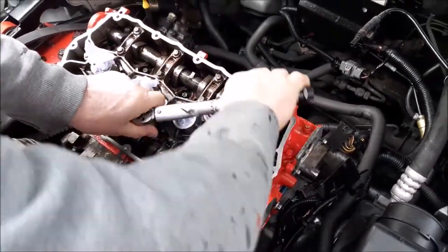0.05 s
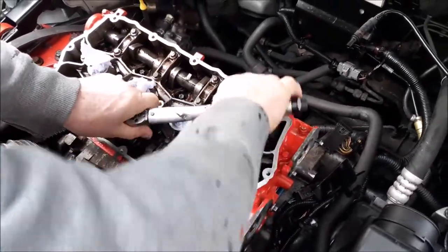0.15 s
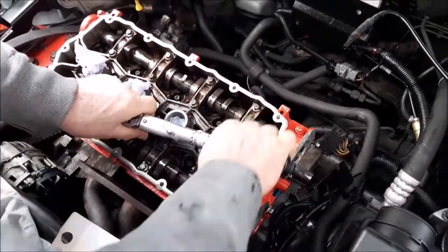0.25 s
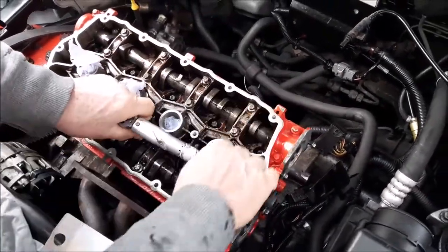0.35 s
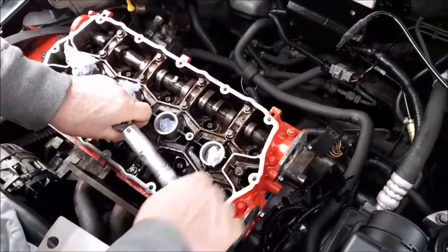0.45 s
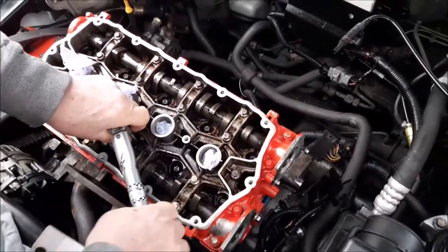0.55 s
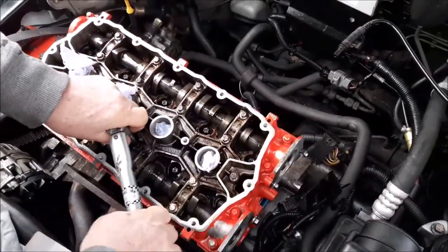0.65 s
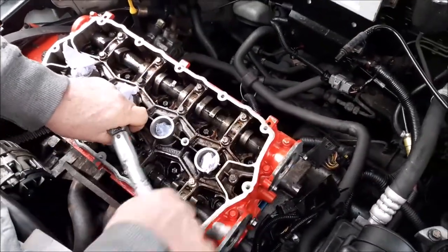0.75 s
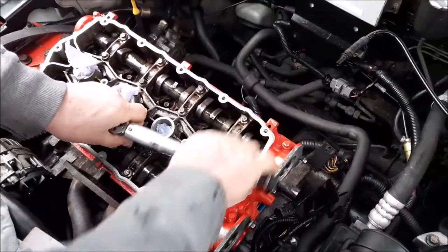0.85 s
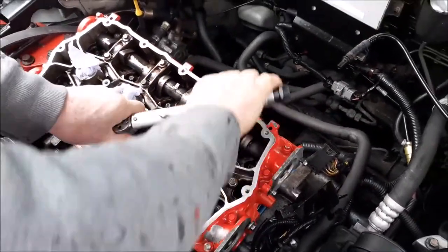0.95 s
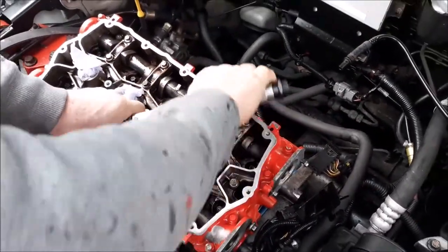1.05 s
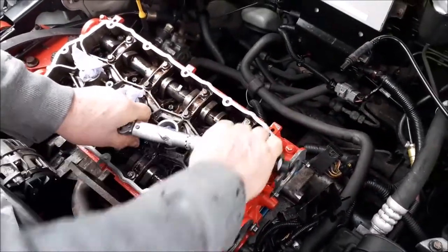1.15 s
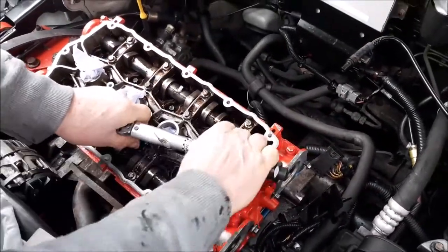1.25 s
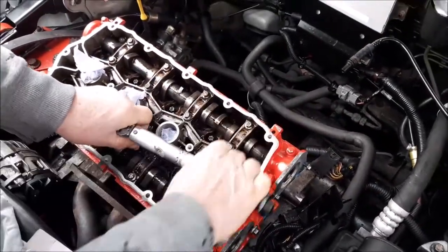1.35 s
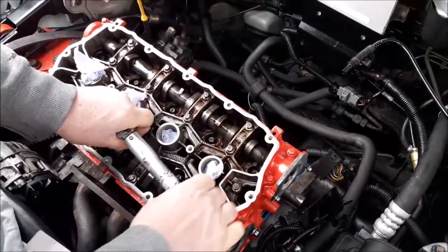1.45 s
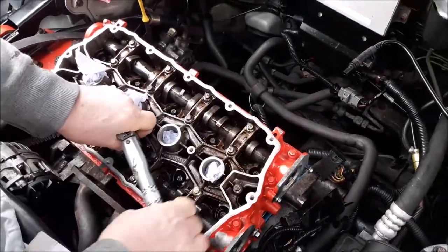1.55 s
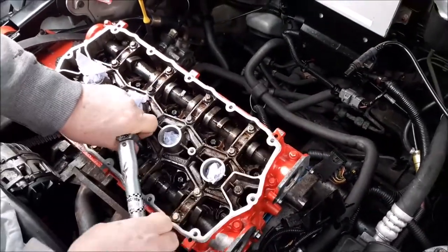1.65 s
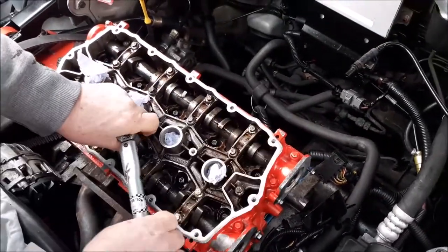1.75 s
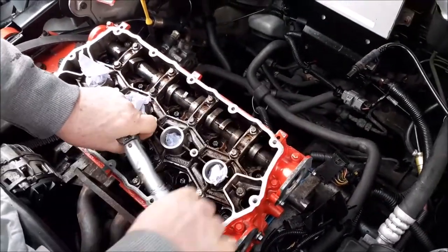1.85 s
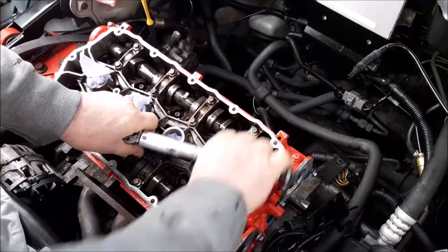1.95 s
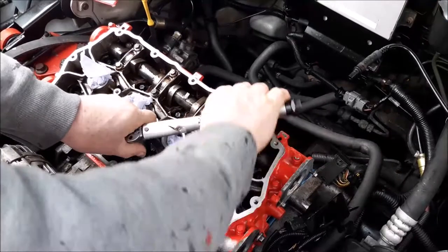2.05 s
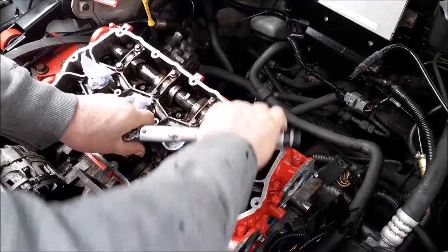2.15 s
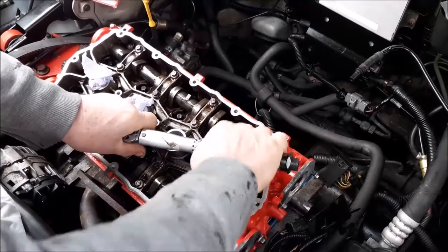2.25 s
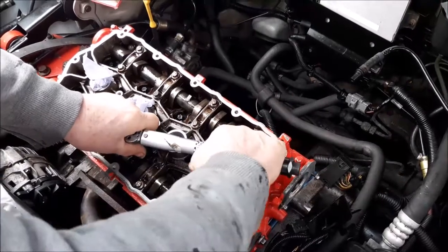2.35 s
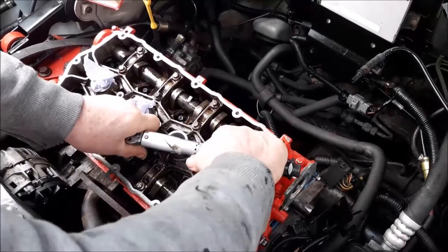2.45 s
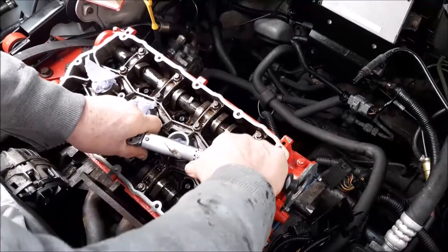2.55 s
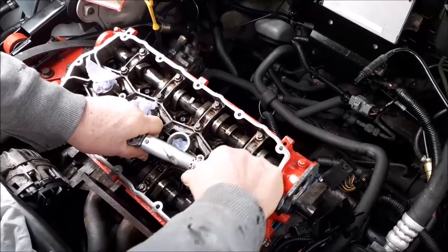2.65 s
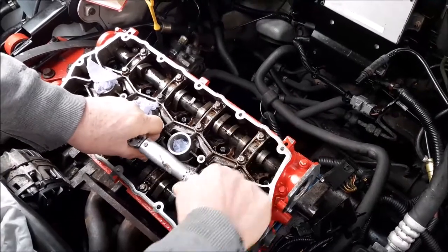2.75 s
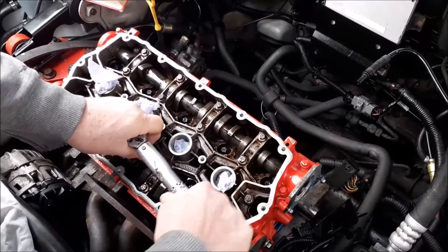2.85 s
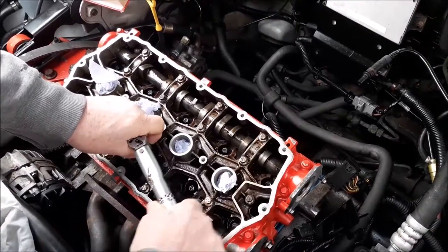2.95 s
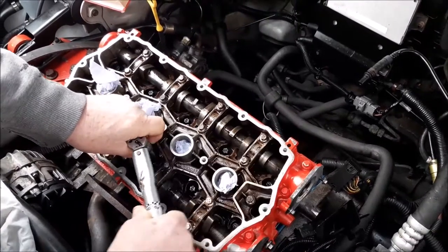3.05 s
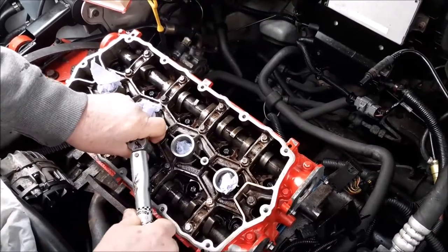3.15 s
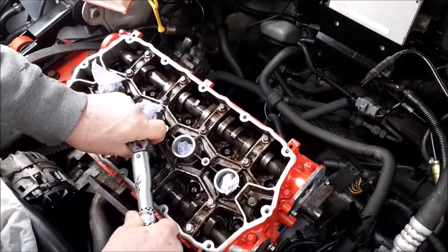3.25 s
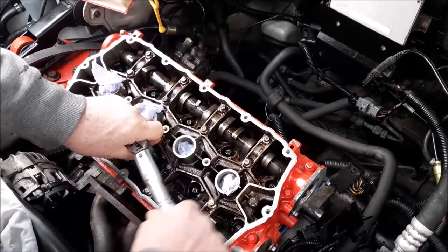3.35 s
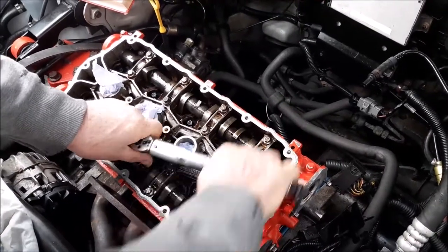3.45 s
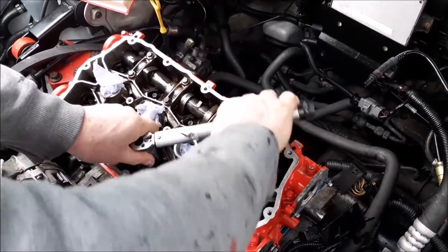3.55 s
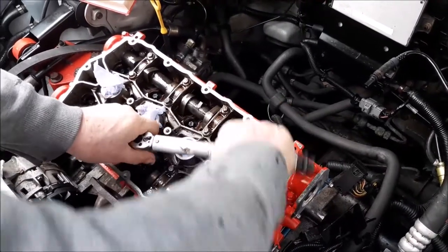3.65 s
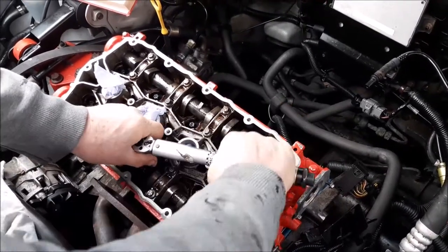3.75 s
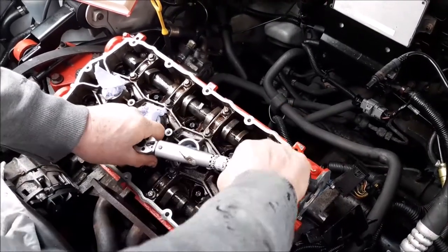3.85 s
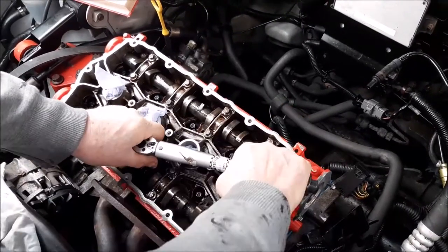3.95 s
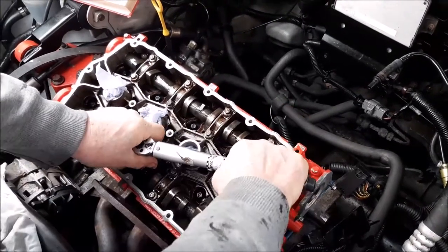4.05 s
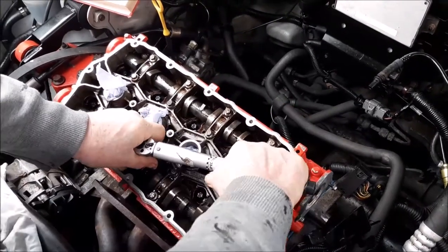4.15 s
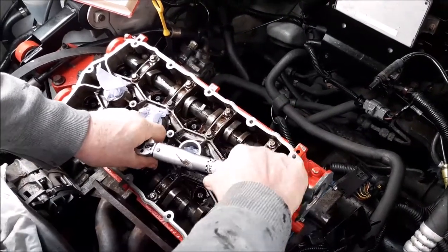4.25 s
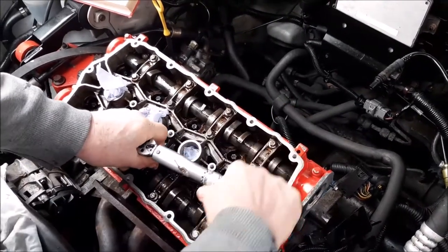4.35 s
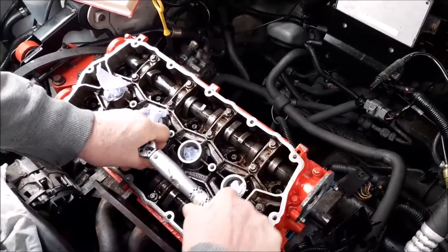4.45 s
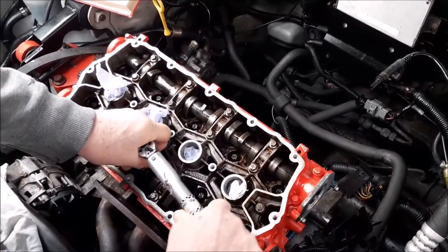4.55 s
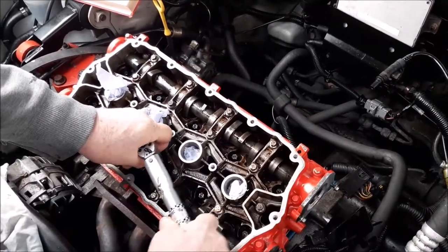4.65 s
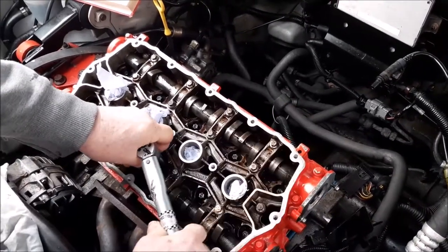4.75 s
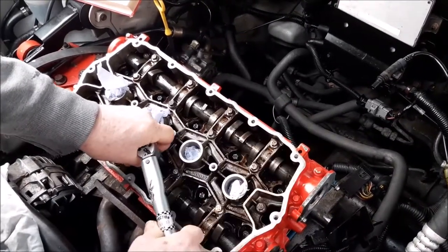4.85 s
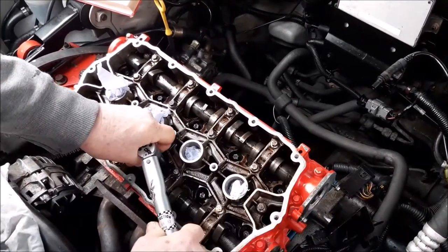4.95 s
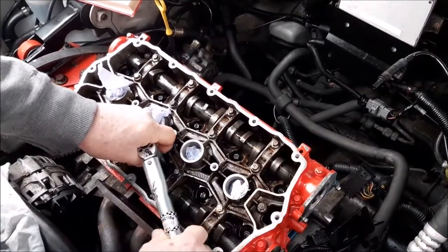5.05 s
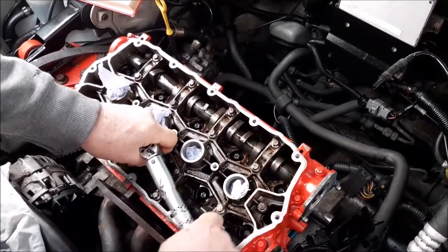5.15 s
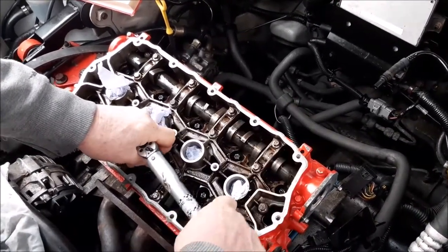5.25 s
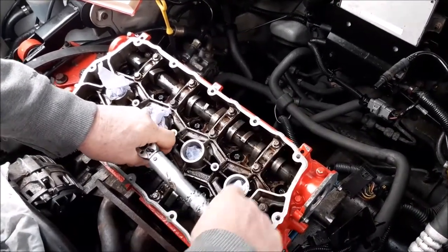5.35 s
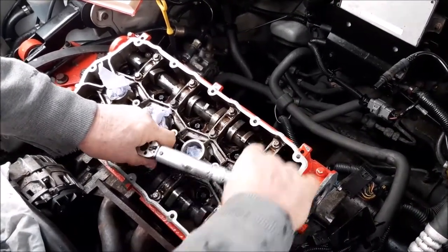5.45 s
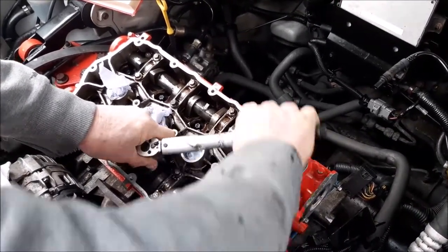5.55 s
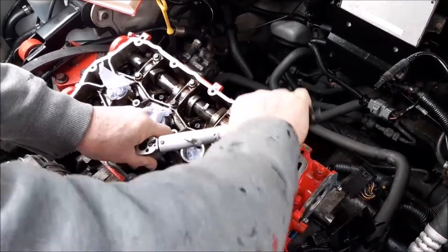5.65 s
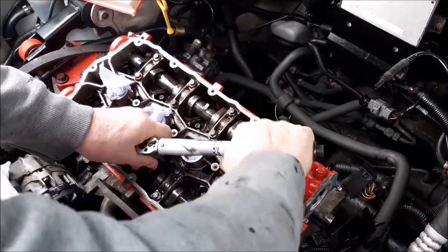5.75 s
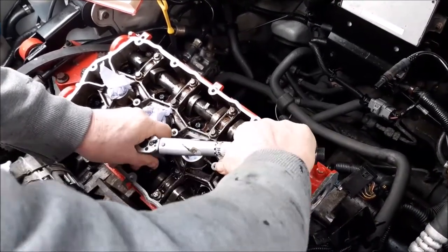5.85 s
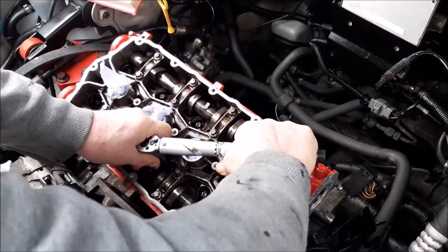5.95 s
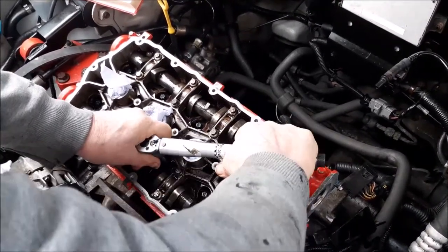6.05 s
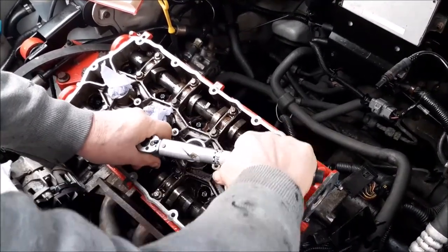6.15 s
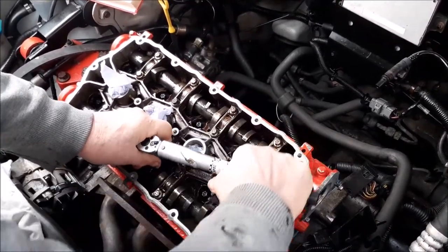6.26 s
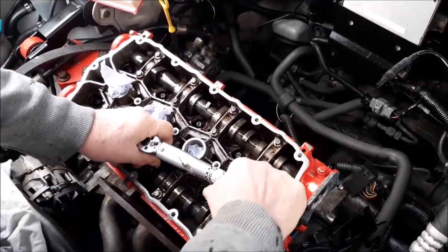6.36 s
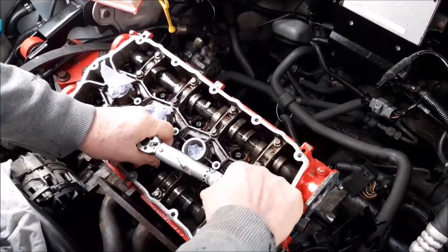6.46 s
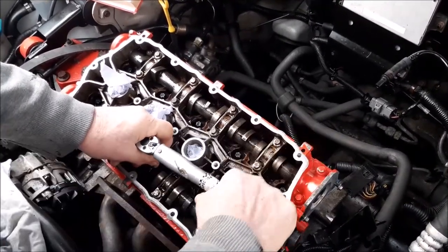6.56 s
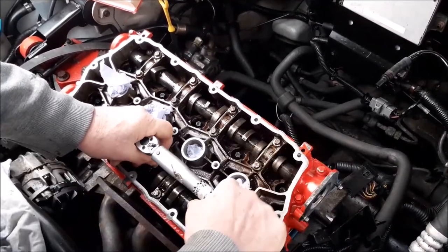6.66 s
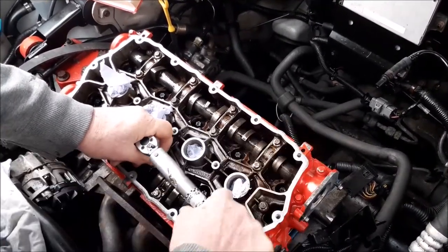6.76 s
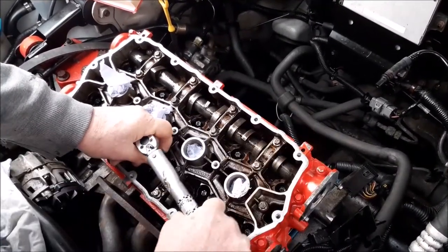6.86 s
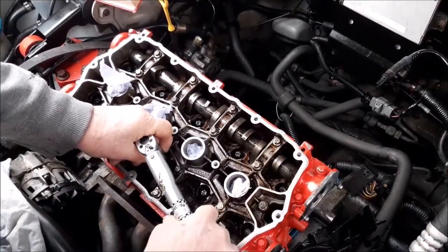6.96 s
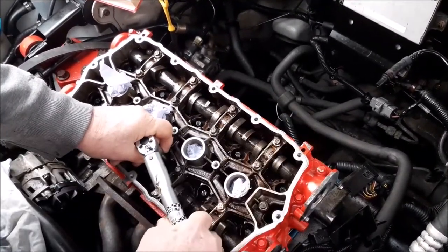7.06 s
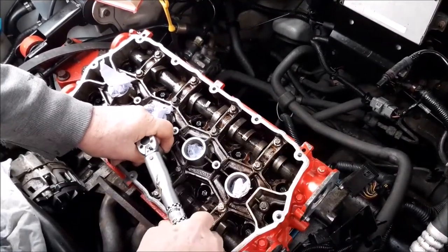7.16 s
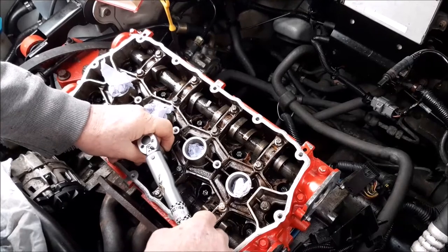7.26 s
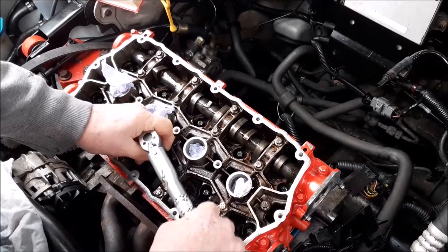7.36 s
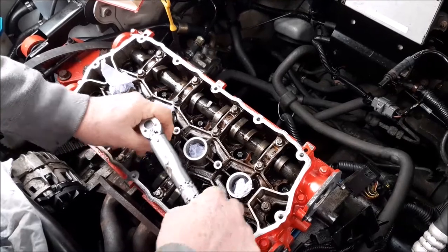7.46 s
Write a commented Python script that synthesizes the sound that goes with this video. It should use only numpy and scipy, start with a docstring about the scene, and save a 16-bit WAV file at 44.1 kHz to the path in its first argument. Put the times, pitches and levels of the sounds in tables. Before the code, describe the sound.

Close up in a quiet garage with little echo, a ratcheting wrench ticks in brief, crisp bursts on each back swing. Light socket rattles and dull metal clonks on the engine alternate with the clicking, the heaviest cluster coming just before the middle. Soft cloth swishes and low hand rumble follow the movement. The ratcheting stops for the last two seconds, leaving room air, a faint far hum and one last sharp clink.

```python
"""A torque wrench ratchets down a cylinder-head bolt, close up in a quiet garage.
On each back swing the pawl slips over a few teeth and snaps home in bright steel clicks. At the ends
of a stroke the socket takes up its play, clinks, and knocks on the engine, which rings and thuds.
Sleeves rustle and hands rumble on the tool; behind them lie steady room air and the faint hum of
a far machine that swells near the end."""
import sys
import numpy as np
from scipy import signal
from scipy.fft import rfft, irfft
from scipy.io import wavfile
from scipy.ndimage import uniform_filter1d

SR = 44100
rng = np.random.default_rng(int(sys.argv[2]) if len(sys.argv) > 2 else 0)


def inscribe(sig):
    """Save sig as 16-bit PCM at rate SR to the path in sys.argv[1].

    A 1-D sig is mono; a 2-D sig holds one channel per row.
    Samples are clipped to [-1, 1] before scaling.
    """
    pcm = np.round(np.clip(np.atleast_2d(sig).T, -1, 1) * 32767)
    wavfile.write(sys.argv[1], SR, pcm.astype(np.int16))


N = 330750
HIT_SIZE = 10240  # samples in one hit
T = np.arange(HIT_SIZE) / SR
EDGE_HZ = 16100

# The pawl dropping off each tooth; the seat is the band of the ring that this tooth lifts:
# start_s, level_db, low_mid_db, top_db, snap_db, seat_hz, seat_db, slip_lead_s
PAWL_CLICKS = [(0.025, -33, 10.5, 9.5, -6.5, 8000, 9, 0.011), (0.0745, -34.5, 11, 8.5, -9, 6500, 8, 0.0047),
               (0.8602, -37.5, 4, 6.5, 2.5, 8400, 6, 0.005),
               (0.8966, -33.5, 2, 5.5, -3.5, 7050, 9.5, 0.0048), (0.9376, -30.5, 4, 11, -5, 8300, 7, 0.005),
               (0.981, -32.5, 9.5, 10, -11, 8300, 9, 0.0061), (1.934, -32.5, 4.5, 4.5, 0.5, 8200, 2, .003),
               (1.9738, -31.5, 0, 5, 0, 4850, -1, 0.0041), (2.0136, -28, 3.5, 4, -7, 15000, 16.5, 0.006),
               (2.0641, -33.5, 2, 7.5, -3, 5700, 7, .0066), (3.4396, -35.5, -5.5, 6, 6, 6100, 8, 0.0078),
               (3.4732, -32.5, 3.5, 9.5, -1, 5160, 11, 0.0039), (3.512, -32, 2, 4, -1, 5120, 9.5, 0.005),
               (3.554, -30.5, 5.5, 4, -10.5, 14500, 9.5, 0.0035),
               (5.4347, -36.5, 0.5, 2.5, 4.5, 8030, 14.5, 0.0093),
               (5.496, -32.5, -1, 4.5, -1, 7660, 8, 0.0047), (5.5499, -33, -2.5, 3.5, -5, 4830, 4, 0.0041),
               (5.62, -34.5, -3, -3.5, -13.5, 8600, 6.5, .0028)]
# Tone colour of the ratchet head: freq_hz, level_db
RATCHET_SPECTRUM = [(150, -35), (1200, -19), (2200, -9), (2900, -9), (3500, -4), (5000, -0.5), (6000, 1),
                    (7200, 2.5), (8100, 0.5), (9200, -4), (11500, -4), (13000, -1), (15200, -6.5),
                    (16000, -24)]
# Clear tones of the steel tool: pitch_hz, level_db, undamped_t60_s
STEEL_MODES = [(5040, -3, .05), (5460, -3, .05), (6470, -3, .06), (7330, -1, .05), (7850, -2, .04),
               (8237, 0, .06), (12600, -6, .04), (14160, -2, .05), (14580, -1, .04), (15040, 1, .04)]
# The loose socket clinking on its drive: start_s, level_db, treble_db, top_db
SOCKET_CLINKS = [(0.259, -51, -14, -4), (0.2683, -42.5, 13.5, -10), (1.172, -52, -3, 2),
                 (1.1803, -45.5, 15, -11), (1.2254, -52.5, 6, 13), (1.6819, -42.5, 14, -2),
                 (1.8384, -58, 7, 23), (1.901, -55, 12, 18), (2.031, -48.5, -12, 18.5),
                 (2.2215, -48, -3, -14), (2.2593, -42.5, 5.5, -35), (3.055, -69, 7, 6),
                 (3.357, -52.5, 6.5, -3.5), (3.401, -56.5, 16, 8), (4.828, -50, -18, -12),
                 (4.889, -68, -4, 0), (5.1425, -56, -0.5, -10), (5.675, -56.5, 2, 5), (5.703, -64, 2, 9),
                 (7.4769, -39.5, -0.5, 22)]
# Tone colour of the socket: freq_hz, level_db
SOCKET_SPECTRUM = [(200, -26.5), (1100, -0.5), (1500, -1.5), (2600, -9), (3500, 5), (4500, -1), (5300, -4),
                   (6300, -8.5), (7100, -9.5), (8200, -0.5), (9200, -8.5), (15500, -19)]
# The tool knocking on the bolt; a harder contact has a higher centre:
# start_s, level_db, centre_hz, thump_db, rasp_db, clonk_hz, clonk_db
BOLT_KNOCKS = [(0.581, -37, 480, -29.5, -10.5, 937, -36), (0.598, -40, 320, -35, -8, 151, -41.5),
               (0.619, -46, 160, -38, 6, 128, -40), (1.176, -53.5, 570, -60, 3, 1010, -53.5),
               (1.673, -37, 830, -33.5, -10.5, 839, -34.5), (1.764, -44.5, 520, -61.5, -7, 743, -50),
               (1.892, -47.5, 440, -31.5, -14.5, 449, -39.5), (2.061, -53.5, 920, -80, 6, 934, -55),
               (2.259, -59, 740, -55, 3, 630, -48.5), (3.045, -54, 754, -60, -10, 935, -60),
               (3.109, -43, 700, -60.5, -10.5, 1365, -43.5), (3.116, -34.5, 537, -49, -4.5, 649, -30),
               (3.148, -43, 200, -44, -7, 258, -35.5), (3.161, -40.5, 398, -37.5, -2, 267.5, -27.5),
               (3.259, -53.5, 277, -62.5, -15, 270, -47.5), (3.333, -40, 594, -39.5, 1, 657, -32.5),
               (3.362, -44, 202, -41, 3.5, 203, -31), (4.824, -41.5, 1200, -36.5, -8.5, 1365, -36.5),
               (4.829, -35.5, 500, -36.5, -5, 662, -27), (4.881, -71.5, 450, -44, 25.5, 570, -59),
               (4.999, -51, 540, -85, -10, 654, -52.5), (5.706, -66, 380, -55, 18, 398, -53),
               (7.481, -62, 1900, -43, 8, 1096, -47.5)]
# Modes of the engine with the tool on it: pitch_hz, level_db, t60_s
ENGINE_MODES = [(96, -4, .28), (122, -1, .24), (137, -2, .2), (205, -3, .13), (266, 1, .13), (305, -9, .1),
                (415, -8, .09), (490, -7, .06), (565, -7, .06), (715, -7, .06), (800, -8, .08),
                (955, -6, .08), (1070, -10, .06), (1243, -8, .09), (1383, -7, .11), (1470, -9, .1),
                (1690, -13, .06), (1815, -10, .07), (2024, -13, .08), (2340, -8, .08), (2720, -8, .06)]
# Thud of the dense modes between those: freq_hz, level_db
THUD_SPECTRUM = [(25, -23), (50, 1.5), (110, 12.5), (260, 12.5), (560, 10), (1150, 2), (1900, 5),
                 (2700, 11), (3800, 8), (8000, -1), (15000, -8)]
# Decay of that thud: freq_hz, t60_s
THUD_DECAY = [(100, 0.36), (500, 0.22), (1500, 0.12), (8000, 0.13)]
# Swings of the arm: middle_s, length_s, rustle_db, rumble_db
ARM_SWINGS = [(0.165, 1.96, -60.5, -80), (1.0, 0.51, -61.5, -57.5), (1.96, 0.69, -59, -59),
              (2.792, 0.26, -72, -58.5), (3.373, 0.21, -66, -52), (3.856, 0.64, -68.5, -59.5),
              (4.426, 0.47, -71.5, -61), (4.952, 0.32, -68, -59.5), (5.5, 1.05, -71.5, -73),
              (6.517, 3.1, -73, -67.5), (7.448, 0.13, -68, -64)]
# Tone colour of sleeve cloth: freq_hz, level_db
SLEEVE_SPECTRUM = [(100, -18.5), (300, 3.5), (600, -1), (1050, 0), (1600, -8), (2600, -18), (5000, -25),
                   (9000, -23), (15000, -21)]
# Low rumble of hands on the tool: freq_hz, level_db
HANDLING_SPECTRUM = [(20, -37.5), (33, -18.5), (48, -6), (65, 3), (110, 4), (190, -9.5), (280, -7.5),
                     (400, -36.5), (900, -60.5), (4000, -83.5)]
# A hand or cuff brushing the engine: middle_s, level_db, half_length_s, centre_hz
CUFF_RUBS = [(0.289, -58, 0.041, 700), (0.395, -56, 0.063, 840), (1.049, -56, 0.061, 284),
             (1.399, -68.5, 0.29, 1150), (2.419, -64, 0.13, 723), (3.699, -63, 0.1, 565),
             (3.992, -53.5, 0.08, 236), (4, -61.5, 0.11, 855), (4.355, -66, 0.14, 1220),
             (4.421, -65, 0.16, 593), (5.398, -66.5, 0.034, 870), (5.682, -67.5, 0.041, 1700),
             (7.431, -73, 0.04, 1700), (7.436, -71.5, 0.077, 4560)]
# Reverb decay of the garage: freq_hz, t60_s
GARAGE_DECAY = [(100, 0.18), (500, 0.2), (2300, 0.42), (7000, 0.25), (15000, 0.26)]
# The far machine swelling and sagging a little in pitch: time_s, level_db, pitch_hz
HUM_CURVE = [(4.25, -83.5, 380), (4.46, -71.5, 380), (4.7, -81.5, 380), (5.9, -82, 379), (6.13, -67.5, 378),
             (6.27, -73, 377.5), (6.442, -63, 376.5), (6.721, -68.5, 376), (6.88, -64, 375),
             (7.0, -69, 374), (7.09, -82.5, 374), (7.5, -74.5, 374)]
# Room tone of the garage: freq_hz, level_db
AIR_SPECTRUM = [(15, -38), (28, -18), (45, -2), (70, 1), (105, -3), (200, -12), (300, -11), (430, -18),
                (620, -23), (1000, -23.5), (1400, -31), (2700, -38), (6000, -42.5), (8000, -39),
                (14800, -37.5), (16000, -45)]
# Likeness of left and right: freq_hz, correlation
STEREO_LIKENESS = [(30, 0.6), (130, 0.94), (300, 0.7), (700, 0.05), (1300, -0.22), (2500, -0.2),
                   (6000, -0.05), (15000, 0.12)]


def pawl():
    """The pawl slips over a tooth and snaps home; the cylinder head echoes and scatters the click."""
    near, to_walls = np.zeros((2, 2, N))
    hz = np.linspace(0, EDGE_HZ, 64)
    seat_width_hz, scatter_t60_s, echo_s, pan_db = 450, .027, .0024, 1.5
    for start_s, db, low_mid_db, top_db, snap_db, seat_hz, seat_db, lead_s in PAWL_CLICKS:
        tilt_db = curve([(2500, low_mid_db), (7000, .03), (14000, top_db)], hz)
        head_db = curve(RATCHET_SPECTRUM, hz) + tilt_db
        # every tooth seats differently and lifts other narrow bands
        lift_db = seat_db * np.exp(-((hz - seat_hz) / seat_width_hz) ** 2)
        patchy_db = 2 * rng.standard_normal(len(hz))
        colour = np.transpose([hz, head_db + lift_db + patchy_db])
        slip = amp(-5.5) * burst(colour, t60_s=.028, rise_s=.0005)
        scatter = amp(8.5) * burst(colour, scatter_t60_s, rise_s=.0015)
        crack = amp(9.5 + snap_db) * snap(colour)
        echo = amp(-4) * burst(colour, t60_s=.012, rise_s=.0004)
        diffuse = amp(9) * burst(np.transpose([hz, head_db]), scatter_t60_s, rise_s=.0015)
        ring = amp(-13.5) * steel_ring()
        gain = amp(db)
        add(near, start_s - lead_s, gain * slip, pan_db)
        add(near, start_s, gain * (crack + scatter + ring), pan_db)
        add(near, start_s + echo_s, gain * echo, pan_db)
        add(near, start_s, gain * tube_ring())
        add(to_walls, start_s, gain * (diffuse + ring))
    return near, to_walls


def snap(spectrum, lag_s=6 / SR):
    """The dry crack of steel on steel, reaching the left microphone first."""
    crack = unit_rms(noise(spectrum, HIT_SIZE)[0]) * envelope(t60_s=.008, rise_s=.00008)
    return np.array([crack, np.interp(T - lag_s, T, crack, left=0)])


def steel_ring(hand_damping=.91):
    """The tool's own tones, shortened by the hand; every click excites them in another mix."""
    hz, db, t60_s = np.transpose(STEEL_MODES)[:, :, None]
    phase, width, strength = rng.standard_normal((3, len(hz), 1))
    decays = amp(db + 2.7 * strength) * envelope(t60_s * hand_damping, rise_s=.00034)
    angle = 2 * np.pi * (hz * T + phase)
    return np.array([(decays * np.sin(angle + side * width)).sum(0) for side in (-1, 1)])


def tube_ring(pitch_hz=2293, level_db=-40, t60_s=.7):
    """The wrench's tube sings on faintly after a tooth strikes."""
    t = np.arange(SR) / SR
    return np.sin(2 * np.pi * (pitch_hz * t + rng.random((2, 1)))) * amp(level_db - 60 * t / t60_s)


def socket_clinks():
    """The socket ticks and rattles on the square drive as the hand changes direction."""
    out = np.zeros((2, N))
    for start_s, db, treble_db, top_db in SOCKET_CLINKS:
        tilt = [(4000, .00095), (8200, treble_db), (11500, top_db), (15000, -1.4)]
        colour = [(hz, band_db + curve(tilt, hz)) for hz, band_db in SOCKET_SPECTRUM]
        rattle = burst(colour, t60_s=.04, rise_s=.00009)
        tick = amp(2) * snap(colour)
        ring = amp(-32.5) * steel_ring()
        add(out, start_s, amp(db) * (tick + rattle + ring), pan_db=4.5)
    return out


def engine_knocks():
    """Each blow on the bolt layers the engine's ring, a dense thud, a dull crack and a clonk."""
    out = np.zeros((2, N))
    mid_band = signal.butter(2, [500, 2100], "band", fs=SR, output="sos")
    for start_s, *force, clonk_hz, clonk_db in BOLT_KNOCKS:
        ring = engine_ring(force)
        dense = noise([(hz, db + blow_db(hz, *force)) for hz, db in THUD_SPECTRUM], HIT_SIZE)
        thud = amp(2) * band_decay(dense, THUD_DECAY) * (1 - np.exp(-T / .0009))
        crack = amp(13.5) * signal.sosfilt(mid_band, dense) * envelope(t60_s=.018, rise_s=.0002)
        add(out, start_s, ring + thud + crack, pan_db=2)
        add(out, start_s, amp(clonk_db) * clonk(clonk_hz))
    return out


def engine_ring(force):
    """The engine's clear modes; how hard the blow lands sets their balance."""
    hz, db, t60_s = np.transpose(ENGINE_MODES)[:, :, None]
    sign = (-1) ** np.arange(len(hz))[:, None]  # neighbouring modes swing opposite ways
    width, detune = rng.standard_normal((2, len(hz), 1))
    angle = 2 * np.pi * hz * (1 + .0046 * detune) * T
    apart = width * np.minimum(hz / 1700, 1)  # high modes reach the microphones out of step
    decays = sign * amp(db + blow_db(hz, *force)) * envelope(t60_s, rise_s=60 / hz ** 2)
    return np.array([(decays * np.sin(angle + side * apart)).sum(0) for side in (-1, 1)])


RASP_HZ = 1560  # a cushioned blow has little above this; bare steel rasps


def blow_db(hz, level_db, centre_hz, thump_db, rasp_db):
    """Force spectrum of a knock: a peaked hump, a rasping top and the low thump of its weight."""
    flat_above_hz, thump_hz = 2780, 108
    octaves = np.log2(np.minimum(hz, flat_above_hz) / centre_hz)
    peak_db = 2.5 * np.exp(-(octaves / .29) ** 2)
    slope_db = np.minimum(6.5 * octaves, -4.5 * octaves)
    top_db = rasp_db / (1 + (RASP_HZ / hz) ** 10)
    hump = amp(level_db + peak_db + top_db + slope_db)
    thump = amp(thump_db - 26 * np.log2(np.maximum(hz / thump_hz, 1)))
    return 20 * np.log10(np.hypot(hump, thump))


def clonk(pitch_hz, overtone_ratio=2.08, width_rad=.35):
    """The hollow tone of socket and bolt, pitched by their seating; only low clonks get an overtone."""
    overtone_gain = amp(-12) / (1 + (pitch_hz * overtone_ratio / RASP_HZ) ** 10)
    angle = 2 * np.pi * pitch_hz * T + np.array([[width_rad], [-width_rad]])
    tone = np.sin(angle) + overtone_gain * np.sin(overtone_ratio * angle)
    return tone * envelope(t60_s=.075, rise_s=.0014)


def arm_swings():
    """Sleeves rub in uneven grains while the hands jostle the tool; both swell with each swing."""
    t = np.arange(N) / SR
    middle_s, length_s, rustle_db, rumble_db = np.transpose(ARM_SWINGS)[:, :, None]
    speed = np.exp(-2 * ((t - middle_s) / length_s) ** 2)
    grain_db = .97 * unit_rms(uniform_filter1d(rng.standard_normal(N), size=700))
    cloth = unit_rms(noise(SLEEVE_SPECTRUM, N) * amp(grain_db))
    rustle = cloth * np.linalg.norm(amp(rustle_db) * speed, axis=0)
    rumble = unit_rms(noise(HANDLING_SPECTRUM, N)) * np.linalg.norm(amp(rumble_db) * speed, axis=0)
    catch_db = 1.5 * wander(rate_hz=12)  # the cloth catches and lets go
    return rustle * amp(catch_db) + rumble


def cuff_rubs():
    """Cloth and skin brush the engine in short, soft swishes."""
    out = np.zeros((2, N))
    for middle_s, db, half_s, hz in CUFF_RUBS:
        size = round(2 * half_s * SR)
        band = [(hz / 8, -35), (hz / 1.5, -5), (hz, 0), (hz * 1.243, -4), (hz * 1.35, -20), (hz * 12, -55)]
        swish = unit_rms(noise(band, size)) * np.hanning(size)
        add(out, middle_s - half_s, amp(db) * swish)
    return out


def garage_reverb(send, build_s, lowpass_hz):
    """A diffuse tail that builds as the walls answer, a little duller than the direct sound."""
    tail = band_decay(rng.standard_normal((2, SR)), GARAGE_DECAY)
    tail *= np.clip(np.arange(SR) / SR / build_s, 0, 1)
    tail = signal.lfilter(*signal.butter(1, lowpass_hz, fs=SR), tail / np.linalg.norm(tail[0]))
    return signal.fftconvolve(send, tail, axes=1)[:, :N]


def machine_hum():
    """A far machine holds one faint tone that swells, fades and sags in pitch."""
    time_s, db, pitch_hz = np.transpose(HUM_CURVE)
    t = np.arange(N) / SR
    angle = 2 * np.pi * np.cumsum(np.interp(t, time_s, pitch_hz)) / SR
    return amp(np.interp(t, time_s, db)) * np.sqrt(2) * np.sin(angle)


def room_air(level_db=-66.5):
    """The garage's air: a steady, dark bed of noise."""
    return amp(level_db) * unit_rms(noise(AIR_SPECTRUM, N))


def amp(db):
    """Decibels to gain."""
    return 10 ** (np.asarray(db) / 20)


def unit_rms(x):
    """Scales to rms 1."""
    return x / np.sqrt(np.mean(x ** 2) + 1e-20)


def curve(points, hz):
    """Reads a table on a log-frequency axis."""
    freq_hz, value = np.transpose(points)
    return np.interp(np.log(hz + 1), np.log(freq_hz + 1), value)


def add(mix, start_s, sound, pan_db=0):
    """Mixes a stereo sound in; positive pan leans left."""
    part = mix[:, max(round(start_s * SR), 0):][:, :sound.shape[1]]
    part += sound[:, :part.shape[1]] * amp([[pan_db / 2], [-pan_db / 2]])


def noise(spectrum, size):
    """Coloured stereo noise, narrow in the bass and wide above."""
    hz = np.fft.rfftfreq(size, 1 / SR)
    mid, side = rfft(rng.standard_normal((2, size)))
    likeness = np.clip(curve(STEREO_LIKENESS, hz), -1, 1)
    mid *= np.sqrt((1 + likeness) / 2)
    side *= np.sqrt((1 - likeness) / 2)
    return irfft(np.array([mid + side, mid - side]) * amp(curve(spectrum, hz)), size)


def envelope(t60_s, rise_s):
    """Shape of a hit: quick attack, exponential decay."""
    return (1 - np.exp(-T / rise_s)) * amp(-60 * T / t60_s)


def burst(spectrum, t60_s, rise_s):
    """A hit of coloured stereo noise."""
    return unit_rms(noise(spectrum, HIT_SIZE)) * envelope(t60_s, rise_s)


def band_decay(x, decay_table):
    """Lets each band die at its own speed."""
    hz, t, bands = signal.stft(x, SR, nperseg=256)
    bands *= amp(-60 * t / curve(decay_table, hz)[:, None])
    return signal.istft(bands, SR, nperseg=256)[1][:, :x.shape[1]]


def wander(rate_hz):
    """Slow random drift of rms 1, no faster than rate_hz."""
    t = np.arange(0, N / SR + .01, .005)
    rates_hz = np.geomspace(rate_hz / 10, rate_hz, 20)
    drift = sum(np.sin(2 * np.pi * (hz * t + rng.random())) / np.sqrt(hz) for hz in rates_hz)
    return np.interp(np.arange(N) / SR, t, unit_rms(drift))


def scene():
    """Wrench, socket and engine up front with a little reverb; cloth, hum and air behind."""
    clicks, clicks_to_walls = pawl()
    socket, engine = socket_clinks(), engine_knocks()
    send = amp(-17.5) * clicks_to_walls + amp(-12.5) * socket + amp(-27.5) * engine
    reverb = garage_reverb(send, build_s=.019, lowpass_hz=9700)
    return clicks + socket + engine + reverb + arm_swings() + cuff_rubs() + machine_hum() + room_air()


def record(dry):
    """The microphone's bass roll-off and a steep cut at the top of the band."""
    low_cut = signal.butter(3, 45, "high", fs=SR, output="sos")
    high_cut = signal.firwin(511, EDGE_HZ, window=("kaiser", 9), fs=SR)
    return signal.oaconvolve(signal.sosfilt(low_cut, dry), high_cut[None], "same")


dry = scene()
out = record(dry)
inscribe(out)
```